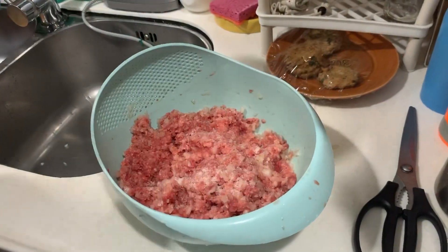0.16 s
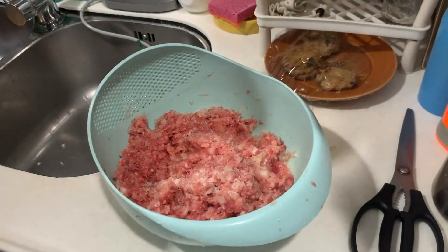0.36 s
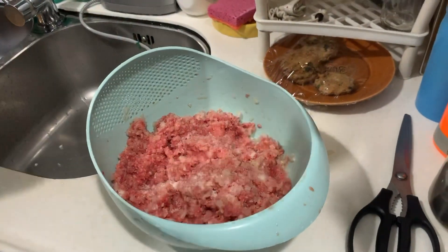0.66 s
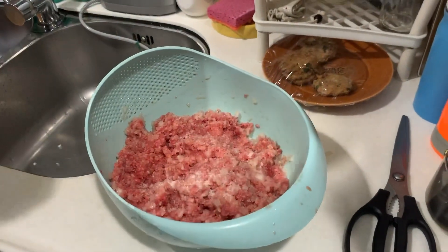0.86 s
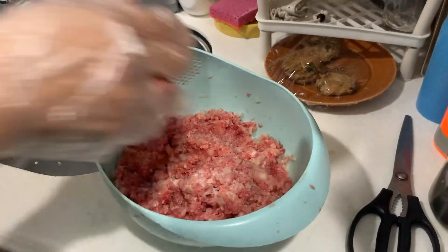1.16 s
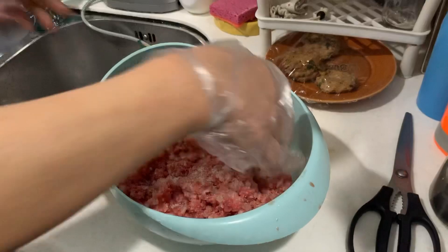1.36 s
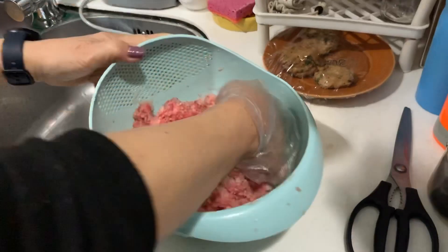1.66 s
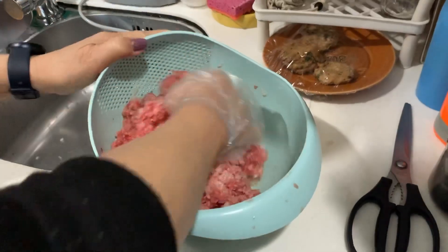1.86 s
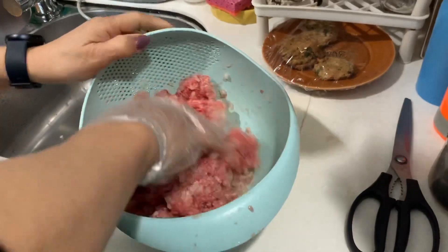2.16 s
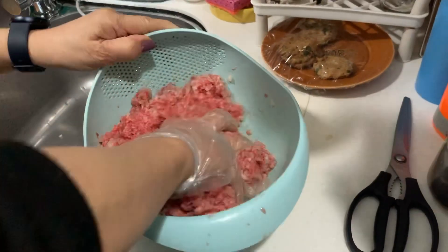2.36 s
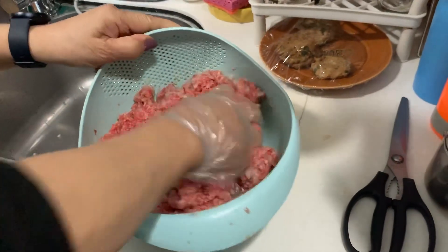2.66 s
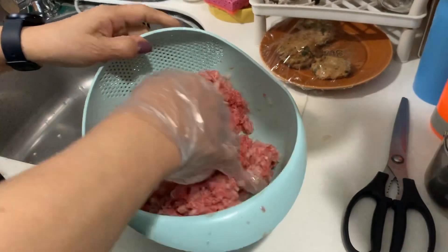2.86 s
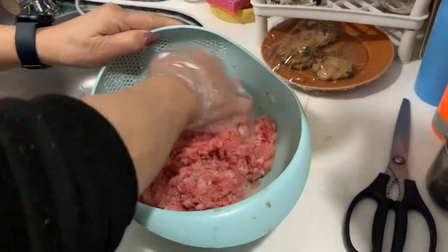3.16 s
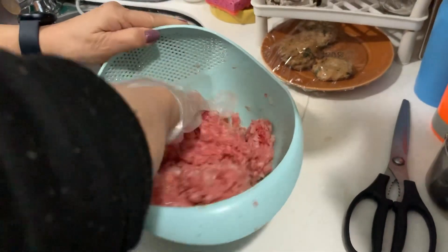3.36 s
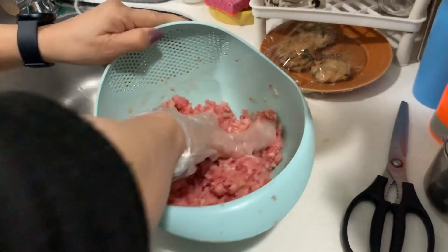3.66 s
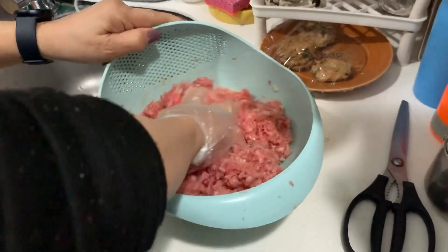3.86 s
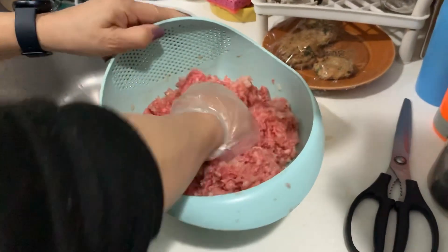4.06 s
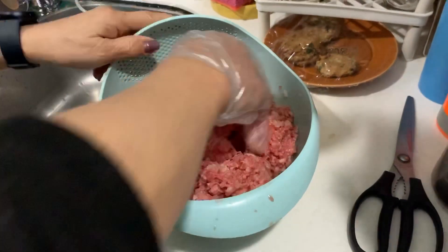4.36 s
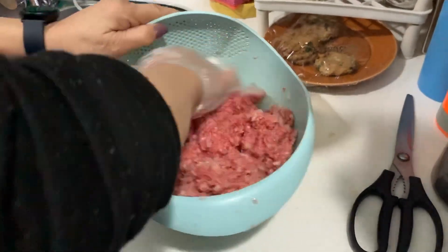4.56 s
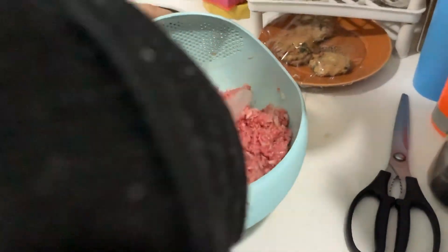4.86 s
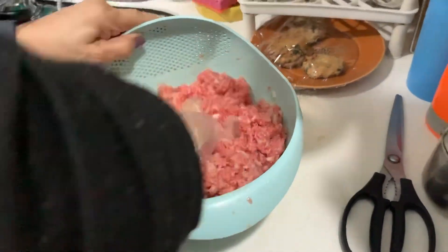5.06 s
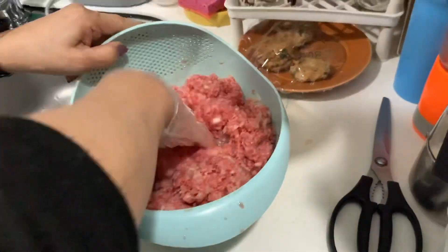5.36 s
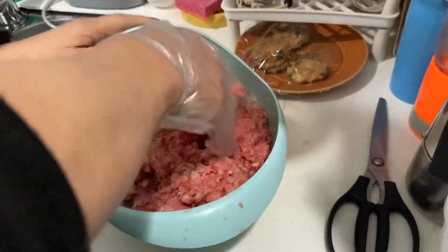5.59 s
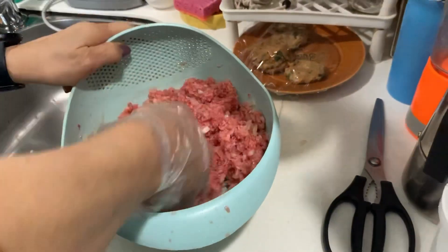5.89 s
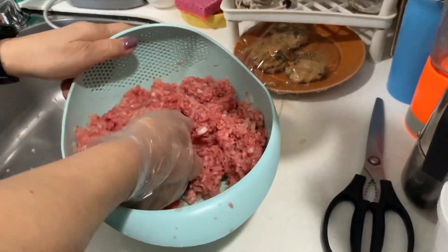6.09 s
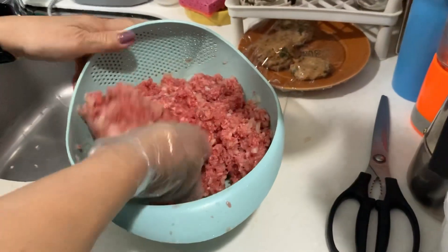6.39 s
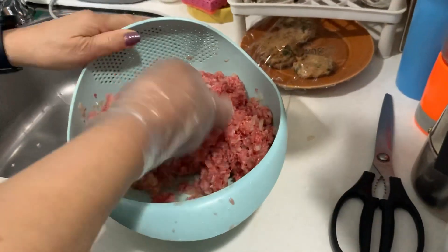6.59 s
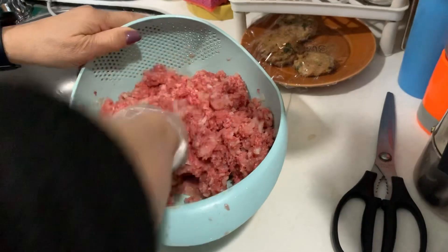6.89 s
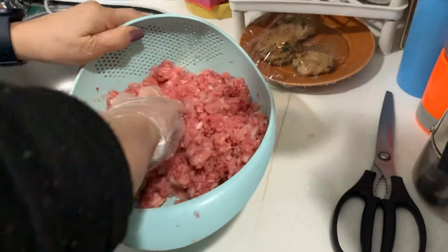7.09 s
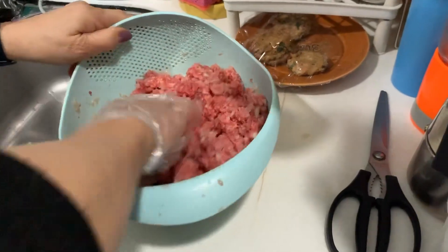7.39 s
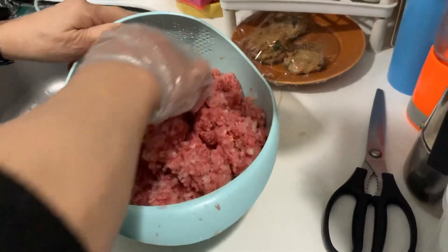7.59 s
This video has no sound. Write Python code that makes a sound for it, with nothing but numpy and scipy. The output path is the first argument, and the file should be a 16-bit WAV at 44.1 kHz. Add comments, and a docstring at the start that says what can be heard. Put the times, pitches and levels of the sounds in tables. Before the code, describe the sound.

A plastic bowl knocks three times, then a gloved hand kneads minced meat with crinkles and wet squishes over a low hum.

```python
"""A hand in a thin plastic glove kneads minced meat in a plastic bowl on a kitchen counter.
First the bowl is nudged and knocks three times. Then the glove crinkles above it, and after about
1.3 seconds the hand is in the meat. From there on each squeeze crinkles the glove and squishes the
wet meat; now and then an air pocket pops or the bowl bumps. A kitchen appliance hums from start
to end. Two close microphone openings, left and right, hear it all."""
import sys
import numpy as np
from scipy import signal
from scipy.fft import rfft, irfft, next_fast_len
from scipy.io import wavfile
from scipy.ndimage import map_coordinates

SR = 44100
rng = np.random.default_rng(int(sys.argv[2]) if len(sys.argv) > 2 else 0)


def waveform_to_disk(signal):
    """Save audio, clipped to [-1, 1], as 16-bit WAV at the path in sys.argv[1]."""
    frames = np.transpose(np.atleast_2d(signal))
    scaled = np.clip(frames, -1, 1) * 32767
    samples = np.round(scaled).astype(np.int16)
    wavfile.write(sys.argv[1], SR, samples)


N = 341334
TOP_HZ = 15800

# The low tones of the bowl on the counter. Each row: pitch in Hz, width in Hz, relative level in dB.
BOWL_TONES = [(218, 55, -4), (287.4, 52, 0), (348.5, 55, -0.5), (443, 58, -2), (520, 76, -3), (617, 69, -6),
              (766, 103, -7.5)]
# The tone colour of wet meat. Each row: frequency in Hz, relative level in dB.
MEAT_COLOUR = [(200, -33), (600, -7), (850, -7.5), (1150, 0), (2000, -2.5), (2700, 0), (3600, 1.5),
               (5000, -0.5), (8000, -14.5), (16000, -41.5)]


def kneading():
    """How loud crinkle and squish are over time, in dB: each squeeze tightens, holds, then lets go."""
    # Each row: start in seconds, length in seconds, relative levels of bright crinkle and of lower
    # squish in dB. In the first three squeezes, above the bowl, both are the glove.
    squeezes = [(0.866, 0.1255, -44, -62.5), (1.012, 0.094, -41, -56.5), (1.19, 0.14, -52, -58),
                (1.328, 0.032, -36.5, -42.5), (1.35, 0.06, -36.5, -42), (1.427, 0.12, -40, -46.5),
                (1.63, 0.16, -41, -50.5), (1.809, 0.145, -43.5, -56.5), (2.056, 0.069, -32.5, -45),
                (2.153, 0.18, -31.5, -42.5), (2.344, 0.14, -36, -43), (2.543, 0.1235, -31.5, -44.5),
                (2.833, 0.12, -37.5, -48.5), (2.947, 0.088, -33.5, -44), (3.047, 0.06, -37.5, -47),
                (3.15, 0.31, -44.5, -55), (3.461, 0.1114, -36.5, -49.5), (3.56, 0.23, -31.5, -43.5),
                (3.789, 0.131, -33, -43.5), (3.995, 0.094, -31, -42), (4.126, 0.1, -43.5, -53),
                (4.276, 0.22, -36.5, -46.5), (4.55, 0.1, -41, -50), (4.736, 0.2, -37, -45.5),
                (4.863, 0.22, -34, -43), (5.163, 0.11, -31.5, -42.5), (5.337, 0.041, -41, -59),
                (5.44, 0.24, -37, -48), (5.812, 0.043, -38, -48), (5.979, 0.045, -43, -62),
                (6.08, 0.068, -42.5, -53.5), (6.16, 0.034, -39, -54), (6.411, 0.0525, -39.5, -64.5),
                (6.537, 0.13, -37.5, -59), (6.718, 0.062, -37, -53.5), (6.847, 0.18, -33.5, -44.5),
                (7.137, 0.09, -46, -53), (7.246, 0.14, -33.5, -47), (7.593, 0.127, -37.5, -50)]
    hand_in_s, tighten_share, release_db_per_s = 1.33, 0.59, 89
    rest_crinkle_db, rest_squish_db = -43.5, -56
    t = np.arange(N) / SR
    # once in the meat, the hand keeps stirring a little between squeezes
    power = amp([[rest_crinkle_db], [rest_squish_db]]) ** 2 * (t > hand_in_s)
    age = np.arange(SR) / SR
    for s, length, crinkle_db, squish_db in squeezes:
        tighten = np.minimum(age / (tighten_share * length), 1)
        grip = tighten * amp(-release_db_per_s * np.maximum(age - length, 0))
        add(power[0], s, (amp(crinkle_db) * grip) ** 2)
        add(power[1], s, (amp(squish_db) * grip) ** 2)
    return 10 * np.log10(power + 1e-12)


def glove(level_db):
    """The thin plastic crinkles in clicks, more of them when squeezed harder; big folds snap over."""
    # The tone colour of the plastic. Each row: frequency in Hz, relative level in dB.
    film_colour = [(500, -40), (2000, -20), (4000, -14.5), (5300, -11), (6500, -4.5), (8000, -2.3),
                   (9500, 1), (12500, -.5), (15500, 1)]
    # Folds snapping. Each row: start in seconds, relative level in dB, seconds to fade by 30 dB.
    snaps = [(.072, -49, .02), (.136, -50, .02), (.473, -47, .02), (.936, -27, .008), (.996, -27, .006),
             (1.048, -23, .01), (1.083, -23, .005), (1.111, -25, .008), (1.167, -25, .006),
             (1.183, -25, .006), (1.208, -27, .015), (1.339, -30, .025), (1.793, -23, .012),
             (2.073, -25, .012), (2.099, -21, .01), (2.729, -22, .008), (2.954, -25, .015),
             (3.182, -27, .008), (4.417, -24, .008), (5.924, -28, .008), (6.014, -25, .006),
             (6.092, -18, .016), (6.208, -24, .01), (6.231, -25, .006), (6.590, -17, .02),
             (6.771, -24, .025), (6.865, -26, .008), (7.337, -23, .01)]
    effort = amp(level_db - level_db.max())
    rate = 1500 + 9000 * effort
    clicks = lambda: grains(rate, spread_db=1.5, clump_db=1, clump_rate=220) / np.sqrt(rate)
    # small creases tick brighter than large ones, and their mix keeps changing
    crease = lambda hz: unit(resonate(clicks(), [(hz, .5 * hz, 0)])) * amp(wobble(25))
    crinkle = coloured(unit(clicks()) + .5 * (crease(hz=6400) + crease(hz=11750)), film_colour)
    # one buckling crease sets off its neighbours in short flurries
    flurry_db = 0.93 * wobble(30) + 0.9 * wobble(110) + 1.24 * wobble(450)
    out = amp(level_db + 2.48) * unit(crinkle * amp(flurry_db))
    t = np.arange(SR // 8) / SR
    for s, db, length in snaps:
        burst = coloured(rng.standard_normal(len(t)), film_colour)
        add(out, s, amp(db - 1.1 - 30 * t / length) * fade_in(t, 0.00081) * burst)
    return out


def squish(level_db):
    """Wet meat parts in sticky clicks and rubs the bowl; above the bowl, this is the glove's low part."""
    clicks = coloured(grains(1700, spread_db=4.5, clump_db=1.5, clump_rate=160), MEAT_COLOUR)
    rub = unit(resonate(grains(1400, spread_db=2, clump_db=1, clump_rate=30), BOWL_TONES))
    return amp(level_db + 2.5) * clicks + amp(level_db - 9.5) * rub


def squelches():
    """Meat slips between fingers: wet clicks swell in a small hollow that rings higher as it closes."""
    # Each row: loudest moment in seconds, length in seconds, middle pitch in Hz, relative level in dB.
    slips = [(1.44, 0.13, 3700, -43.5), (2.118, 0.099, 3800, -47), (2.48, 0.075, 1600, -42.5),
             (2.63, 0.055, 1346, -44), (2.80, 0.075, 940, -47), (3.116, .05, 2400, -42),
             (3.32, 0.14, 2100, -46.5), (3.759, .16, 1250, -48), (3.912, 0.095, 1420, -40.5),
             (4.076, 0.089, 1400, -43.5), (5.049, 0.21, 1090, -47.5), (5.261, 0.1, 1350, -43),
             (5.677, .16, 1345, -54), (6.99, .11, 2350, -50), (7.691, 0.054, 2150, -45)]
    glide, clicks_per_s = 1.12, 900
    out = np.zeros(N)
    t = np.arange(SR // 3) / SR - 1 / 6
    for s, length, hz, db in slips:
        clicks = (rng.random(len(t)) < clicks_per_s / SR) * rng.standard_normal(len(t))
        ring = lambda pitch: resonate(clicks, [(pitch, 0.42 * pitch, 0)])
        hollow = lambda pitch: unit(resonate(ring(pitch), [(pitch, pitch, 0)]))
        closed = np.clip(.5 + t / length, 0, 1)
        wet = unit(np.sqrt(1 - closed) * hollow(hz / glide) + np.sqrt(closed) * hollow(hz * glide))
        swell = np.exp(-(2 * t / length) ** 2)
        add(out, s + t[0], amp(db - 0.5) * swell * wet)
    return out


def pops():
    """Air pockets in the meat burst, each with a brief ring that rises as it opens."""
    # Each row: start in seconds, starting pitch in Hz, relative level in dB.
    pockets = [(1.342, 1300, -33), (2.150, 1800, -33), (2.466, 1888, -22.5), (2.481, 3120, -24),
               (2.483, 1700, -25), (2.614, 1300, -35), (2.954, 3340, -25), (3.145, 2100, -31),
               (3.249, 2020, -29), (3.893, 1500, -30), (4.383, 3390, -30), (4.477, 2400, -30),
               (4.494, 3160, -20.5), (4.496, 1250, -29), (4.497, 2050, -25), (4.917, 3200, -29),
               (5.216, 3430, -28), (5.615, 3680, -30), (6.709, 2820, -28.5), (7.672, 2050, -23),
               (7.675, 3030, -27)]
    rise_per_s = 12
    out = np.zeros(N)
    t = np.arange(SR // 30) / SR
    for s, hz, db in pockets:
        cycles = hz * (t + .5 * rise_per_s * t ** 2)
        add(out, s, amp(db) * fade_in(t, 0.0005) * fade_out(t, .009) * np.sin(2 * np.pi * cycles))
    return out


def smacks():
    """The stuck glove tears free all at once: a sharp wet crack, then a dying shower of clicks."""
    # Each row: start in seconds, relative level in dB, seconds for the shower to fade by 20 dB.
    tears = [(1.378, -37, .02), (1.407, -36, .02), (2.954, -29.5, .07), (3.092, -33.5, .05)]
    clicks_per_s = 4000
    out = np.zeros(N)
    t = np.arange(SR // 8) / SR
    for s, db, length in tears:
        clicks = (rng.random(len(t)) < clicks_per_s / SR) * rng.choice([-1, 1], len(t))
        crack, shower = fade_out(t, .012), amp(-6 - 20 * t / length)
        add(out, s, amp(db) * (crack + shower) * coloured(clicks, MEAT_COLOUR))
    return out


def sticking(crinkle_db, squish_db):
    """Here and there the glove peels off the fat with a tick that stands out of the rustle."""
    bright = crackles(crinkle_db + 15, rate=55, pitch_hz=11000, spread_db=3)
    lower = crackles(squish_db + 14.5, rate=50, pitch_hz=3400, spread_db=3)
    return bright + lower


def crackles(level_db, rate, pitch_hz, spread_db):
    """Separate sticky ticks, rate a second, each a cycle or two at its own pitch; low ones are softer."""
    count = int(rate * N / SR)
    when = rng.integers(0, N, count)
    pitch, size = rng.standard_normal((2, count))
    hz = np.clip(pitch_hz * np.exp(.3 * pitch), 0, TOP_HZ)[:, None]
    lag = np.arange(SR // 300)
    cycles = hz * lag / SR
    ring = np.sqrt(hz / pitch_hz) * np.sin(2 * np.pi * cycles) * np.exp(-cycles / 1.1)
    ticks = amp(level_db[when] + spread_db * np.clip(size, -2, 1))[:, None] * ring
    return np.bincount((when[:, None] + lag).ravel(), ticks.ravel(), N)[:N]


def bowl():
    """Each knock clacks the thin wall, rings the struck spot and thuds through the full bowl."""
    # The ring of the wall. Each row: pitch in Hz, width in Hz, relative level in dB.
    wall_tones = [(810, 230, -3.5), (1140, 120, 3), (1410, 136, 0.5), (2231, 210, -2.5), (2720, 200, -7),
                  (3280, 340, -9.5), (3896, 330, -13)]
    # The tone colour of a knock's sharp crack. Each row: frequency in Hz, relative level in dB.
    crack_colour = [(200, -28.5), (700, -8), (2000, -2.5), (4500, -0.5), (7000, -6), (11000, -9),
                    (16000, -18)]
    # a struck spot boosts the frequencies near its own pitch
    boost_db, boost_octaves, ring_cycles = 7.5, .7, 45
    favour_db = lambda f, hz: boost_db * np.exp(-(np.log2((f + 1) / hz) / boost_octaves) ** 2)
    # gives any blow the energy of 10 ms of sound at level 1
    blow = lambda x: x / np.linalg.norm(x) * np.sqrt(SR / 100)
    out = np.zeros(N)
    t = np.arange(SR // 10) / SR
    for s, spot_hz, clack_db, thud_hz, thud_db in contacts():
        burst = rng.standard_normal(len(t)) * fade_in(t, 0.0006) * fade_out(t, 0.059)
        crack = coloured(burst, crack_colour)
        push = t == 0
        scrape = unit(rng.standard_normal(len(t)) * fade_out(t, 0.021)) / np.sqrt(len(t))
        clack = blow(resonate(push + scrape, wall_tones)) + amp(-0.5) * blow(crack)
        clack = blow(filtered(clack, lambda f: amp(favour_db(f, spot_hz))))
        spot = blow(np.sin(2 * np.pi * spot_hz * t) * fade_out(t, ring_cycles / spot_hz))
        clack = blow(clack + amp(-5.5) * spot)
        # all low tones start at once; how strongly depends on where the bowl lands
        ring = np.zeros(len(t))
        for hz, width, db in BOWL_TONES:
            strength = amp(db + favour_db(hz, thud_hz) + rng.normal(0, 1.5)) * np.sqrt(width)
            ring += strength * np.exp(-np.pi * width * t) * np.sin(2 * np.pi * (hz * t + rng.random()))
        thud = blow(ring * fade_in(t, 0.003))
        add(out, s, amp(clack_db + 1.33) * clack + amp(thud_db) * thud)
    return out


def contacts():
    """List the bowl's knocks: a bumped rim chatters once, and a landing bowl may rock on."""
    # Each row: start in seconds, clack pitch in Hz, relative levels of clack and of thud in dB.
    rim_hits = [(.370, 2300, -35, -38), (.571, 1295, -28, -40.5), (.572, 3010, -34.5, -48),
                (.685, 2390, -45.5, -64), (.709, 2180, -30.5, -39.5)]
    # Each row: start in seconds, clack pitch in Hz, relative clack level in dB, thud pitch in Hz,
    # relative thud level in dB, number of times the bowl touches the counter.
    landings = [(.380, 1440, -35.5, 380, -29, 1), (.405, 1450, -40.5, 380, -36, 1),
                (.592, 8900, -34, 620, -27.5, 1), (.600, 800, -41, 260, -27, 2),
                (.728, 9100, -28.5, 360, -29.5, 2), (.763, 1800, -35, 560, -28.5, 1),
                (.779, 1380, -37, 600, -36, 1), (.799, 1410, -41, 560, -34, 1),
                (.831, 900, -45, 520, -35.5, 1), (1.626, 1400, -61, 250, -49.5, 1),
                (1.817, 1400, -57, 250, -44, 1), (3.095, 750, -39.5, 300, -35.5, 1),
                (3.113, 2300, -44.5, 290, -36, 1), (3.129, 700, -43, 300, -39, 1),
                (3.249, 1900, -49, 300, -44, 1), (3.865, 1400, -51, 450, -42.5, 2),
                (4.496, 1250, -48, 330, -38, 1), (4.976, 1200, -39, 580, -37, 1),
                (5.285, 1400, -54, 450, -48.5, 1), (5.912, 1400, -50, 450, -41.5, 1),
                (6.81, 805, -54, 400, -46, 2), (6.946, 800, -54.5, 450, -43.5, 2)]
    rim_thud_hz, chatter_s, rock_s = 560, .008, .0175
    hits, chatter, rocking = [], [], []
    for s, hz, clack_db, thud_db in rim_hits:
        hits.append((s, hz, clack_db, rim_thud_hz, thud_db))
        chatter.append((s + chatter_s, hz, clack_db - 7.5, rim_thud_hz, thud_db + 8))
    for s, hz, clack_db, thud_hz, thud_db, count in landings:
        for k in range(round(count)):
            loss = np.log2(1 + k)
            rocking.append((s + k * rock_s, hz, clack_db - 5.5 * loss, thud_hz, thud_db - 1.5 * loss))
    return hits + chatter + rocking


def presses():
    """The heel of the hand presses down; the meat cushions it, so only a low thump gets through."""
    # Each row: start in seconds, relative level in dB.
    thumps = [(1.478, -31), (3.255, -37), (4.10, -33.5), (4.18, -39), (6.82, -41)]
    thump_hz = 85
    out = np.zeros(N)
    t = np.arange(SR // 4) / SR
    for s, db in thumps:
        add(out, s, amp(db) * fade_in(t, 0.0098) * fade_out(t, 0.23) * np.sin(2 * np.pi * thump_hz * t))
    return out


def appliance():
    """A slightly unsteady motor hums over a soft rush of air, alike left and right in the bass."""
    # The motor's tones. Each row: pitch in Hz, level in dB.
    hum_tones = [(114.7, -37.5), (99.95, -62), (96.4, -60), (48.76, -63.5), (305.7, -63), (449, -64.5)]
    # The tone colour of the air. Each row: frequency in Hz, relative level in dB.
    air_colour = [(20, -26), (35, -12), (49, 2.5), (62, -3), (80, -5.5), (100, 5), (125, 1.5), (160, -8.5),
                  (220, -10), (310, -6), (380, -14.5), (450, -9.5), (700, -21), (1500, -25), (5000, -31.5),
                  (16000, -42.5)]
    t = np.arange(N) / SR
    hum = np.zeros(N)
    for hz, db in hum_tones:
        strength = amp(db + 0.98 * wobble(4.808))
        hum += strength * np.sin(2 * np.pi * (hz * t + rng.random()) + 0.3 * wobble(4.037))
    common = coloured(rng.standard_normal(N), air_colour)
    apart = coloured(rng.standard_normal(N), air_colour)
    apart = filtered(apart, lambda hz: amp(along([(100, -18.5), (300, -11.5), (700, 2.5)], hz)))
    return hum + amp(-50) * np.array([common + apart, common - apart])


def kitchen(x, close):
    """Sound reaches left and right out of step, with echoes that are weaker for the close sounds."""
    # Each row: frequency in Hz, how far the right side is ahead in radians.
    right_lead = [(0, 0), (260, 0), (360, -.4), (440, -1.1), (530, -2.2), (900, -2.6), (1200, -1.3),
                  (2600, -2.4), (3300, -1.1), (5000, -2.9), (6500, -5.8), (7400, -4.9), (8500, -3.14),
                  (11000, 0), (13300, 3.14), (15700, 6.28)]
    # Each row: frequency in Hz, level of the echoes against the direct sound in dB.
    echo_levels = [(150, -8), (400, -1), (900, 2), (5500, 3), (8000, -7), (16000, -7)]
    close_echo_db, left_sooner_s = -4, .00009
    # The bowl's mouth throws the middle range to the left. Each row: frequency in Hz, lean in dB.
    lean = [(150, 0), (320, -2.5), (600, 0.9), (1200, 2.5), (2200, 2), (4000, -0.9), (8000, -0.33)]
    sides = np.array([[-1], [1]])
    direct = filtered(x, lambda f: np.exp(.5j * np.interp(f, *np.transpose(right_lead)) * sides))
    echo_gain = lambda f: amp(along(echo_levels, f))
    echoes = filtered(reflections(x + amp(close_echo_db) * close), echo_gain)
    balance = lambda f: amp(-sides * along(lean, f)) / np.sqrt(1 + echo_gain(f) ** 2)
    close_direct = filtered(close, lambda f: np.exp(-1j * np.pi * f * left_sooner_s * sides))
    return close_direct + filtered(direct + echoes, balance)


def reflections(x):
    """Bowl, counter and walls echo; the hand keeps moving, so each short stretch echoes differently."""
    # Each row: frequency in Hz, seconds for the echoes to fade by 60 dB.
    echo_times = [(200, 0.1), (1500, 0.1827), (6000, 0.1), (16000, 0.01)]
    hop = SR // 12
    blocks = np.lib.stride_tricks.sliding_window_view(np.pad(x, (hop, 2 * hop)), 2 * hop)[::hop]
    blocks = blocks * np.sin(np.pi * np.arange(2 * hop) / (2 * hop))
    hz, t, noise = signal.stft(rng.standard_normal((len(blocks), 2, 2 * hop)), SR, nperseg=128)
    fade_s = along(echo_times, hz)[:, None]
    tails = signal.istft(noise * fade_out(t, fade_s) / np.sqrt(fade_s), SR, nperseg=128)[1]
    tails /= np.linalg.norm(tails, axis=-1, keepdims=True)
    out = np.zeros((2, N + SR))
    for k, echo in enumerate(signal.fftconvolve(blocks[:, None], tails, axes=-1)):
        out[:, k * hop:k * hop + echo.shape[1]] += echo
    return out[:, hop:hop + N]


def grains(rate, spread_db, clump_db, clump_rate):
    """Tiny clicks of uneven size, rate a second, louder in clumps."""
    fired = rng.random(N) < rate / SR
    size = amp(spread_db * np.clip(rng.standard_normal(N), -2, 2)) * rng.choice([-1, 1], N)
    return fired * size * amp(clump_db * wobble(clump_rate))


def amp(db):
    """Turn decibels into a number to multiply by."""
    return 10 ** (np.asarray(db) / 20)


def unit(x):
    """Scale x to an average (rms) level of 1."""
    return x / np.sqrt(np.mean(x ** 2) + 1e-20)


def fade_in(t, seconds):
    """Rise from 0 towards 1, about two thirds of the way in the given time."""
    return 1 - np.exp(-t / seconds)


def fade_out(t, seconds):
    """Fall by 60 dB in the given time."""
    return amp(-60 * t / seconds)


def along(points, hz):
    """Read between (Hz, value) points, with octaves evenly spaced."""
    f, v = np.transpose(points)
    return np.interp(np.log(hz + 1), np.log(f + 1), v)


def wobble(rate):
    """A smooth random curve through rate points a second."""
    return map_coordinates(rng.standard_normal(int(N * rate / SR) + 4), [np.arange(N) * rate / SR])


def filtered(x, response):
    """Scale and shift each frequency in x as response says."""
    size = x.shape[-1]
    padded = next_fast_len(size + SR // 4)
    return irfft(rfft(x, padded) * response(np.fft.rfftfreq(padded, 1 / SR)), padded)[..., :size]


def coloured(x, colour):
    """Give x a tone colour and an average level of 1."""
    return unit(filtered(x, lambda hz: amp(along(colour, hz))))


def resonate(x, tones):
    """Let x ring at each of the (Hz, width in Hz, dB) tones."""
    return filtered(x, lambda f: sum(
        (-1) ** k * amp(db) * 1j * f * width / (hz * hz - f * f + 1j * f * width)
        for k, (hz, width, db) in enumerate(tones)))


def add(track, s, sound):
    """Lay a sound into a track, starting at s seconds."""
    start = round(s * SR)
    track[start:start + len(sound)] += sound[:N - start]


def scene():
    """Glove, meat and bowl in the humming kitchen."""
    crinkle_db, squish_db = kneading()
    main = glove(crinkle_db) + squish(squish_db) + squelches() + bowl() + presses()
    on_top = pops() + smacks() + sticking(crinkle_db, squish_db)
    return kitchen(main, close=on_top) + appliance()


def record(dry):
    """Cut off all treble above TOP_HZ."""
    return filtered(dry, lambda hz: hz < TOP_HZ)


dry = scene()
out = record(dry)
waveform_to_disk(out)
```